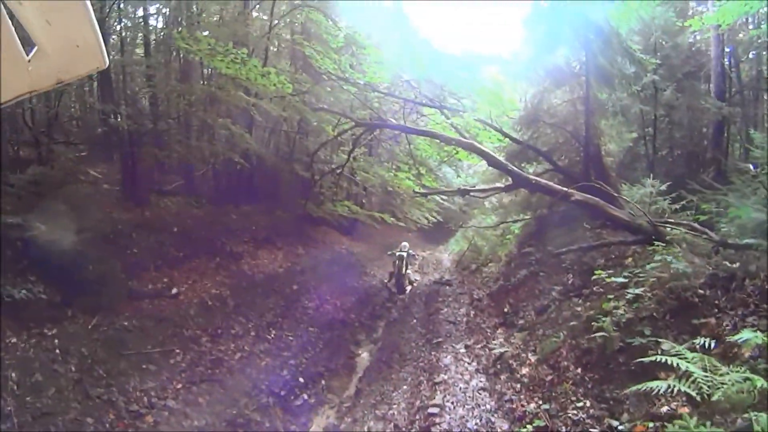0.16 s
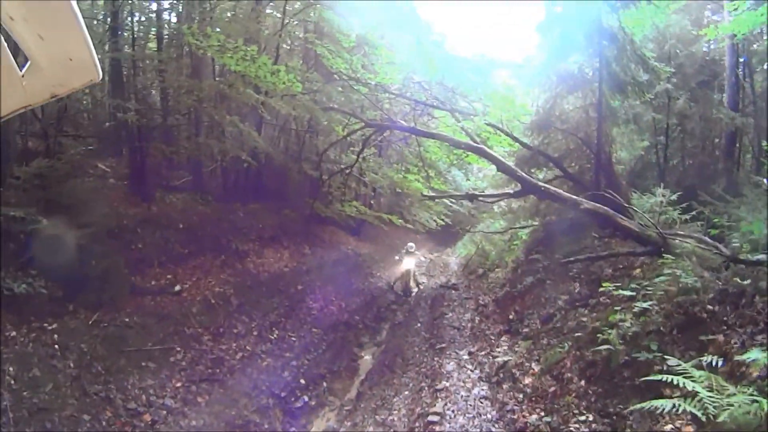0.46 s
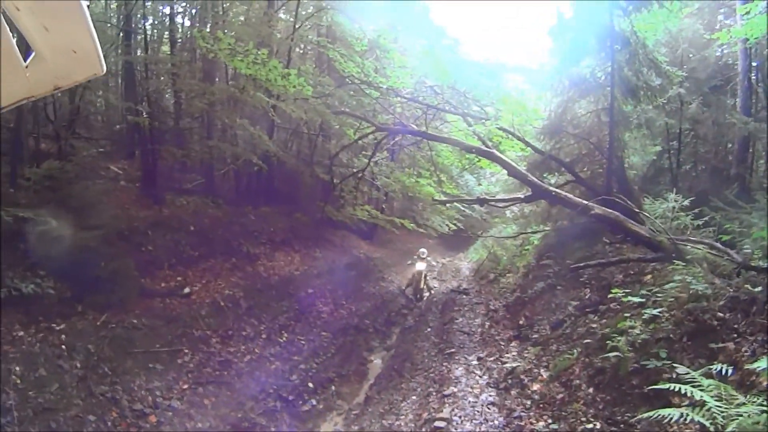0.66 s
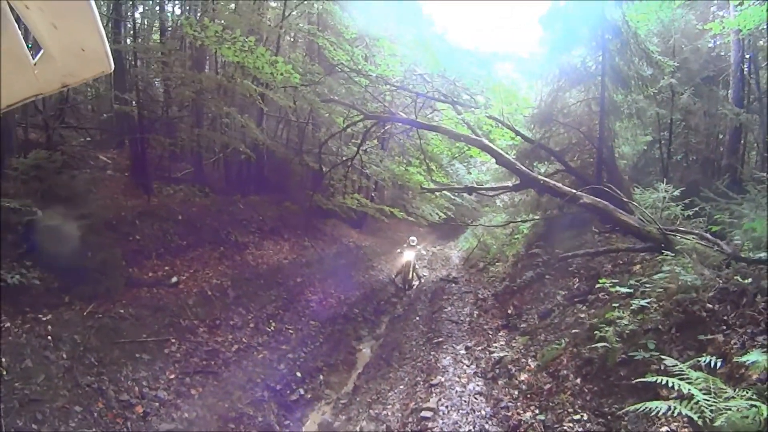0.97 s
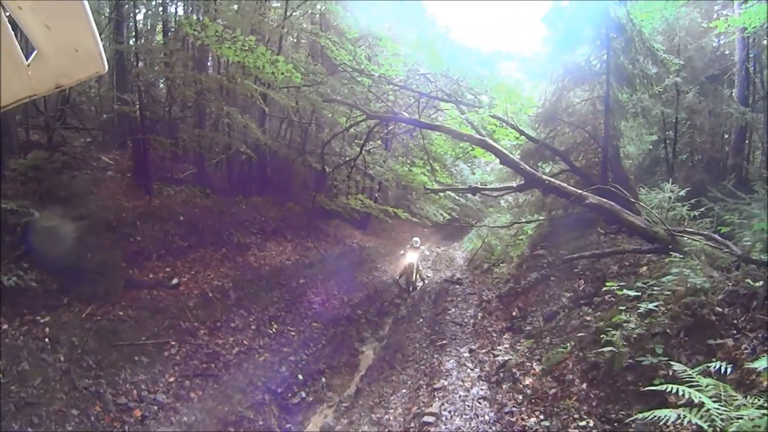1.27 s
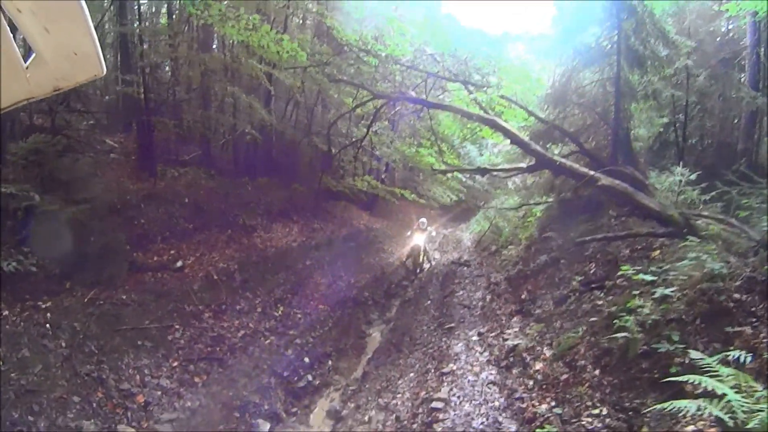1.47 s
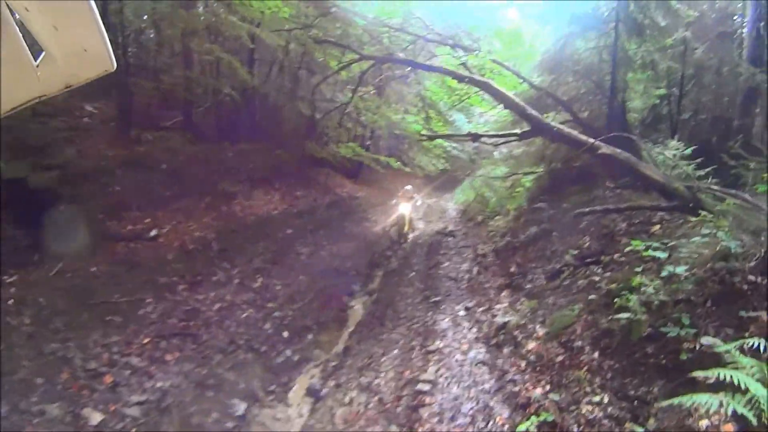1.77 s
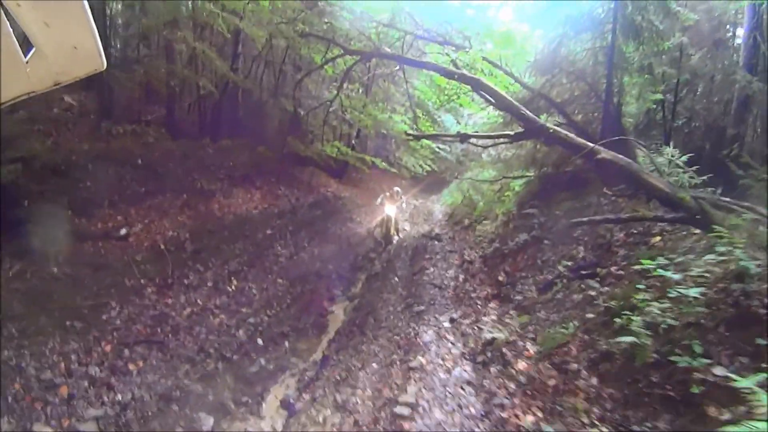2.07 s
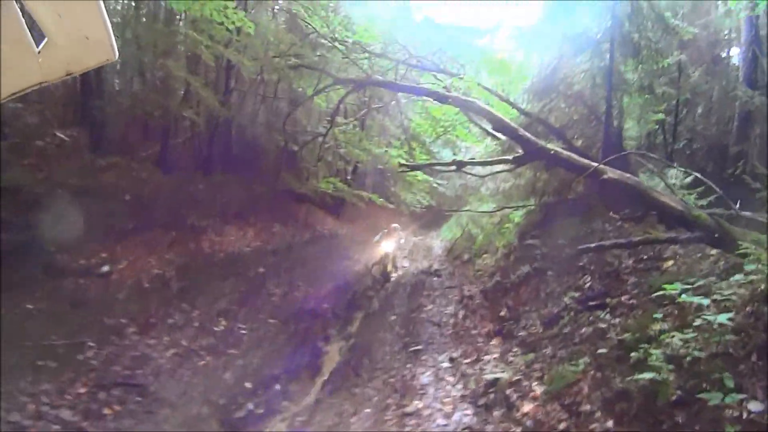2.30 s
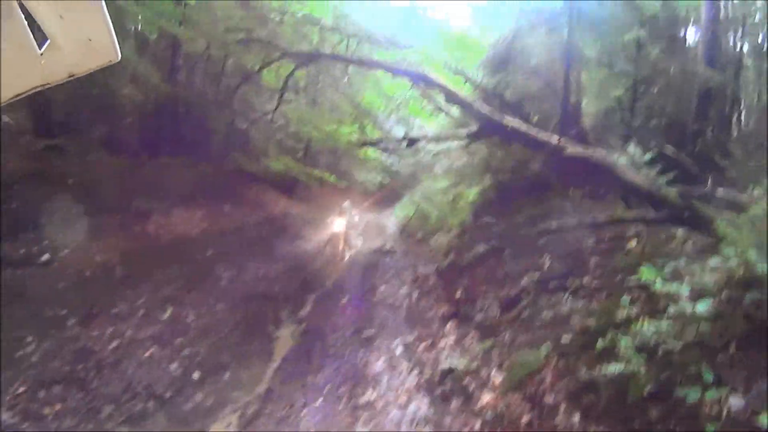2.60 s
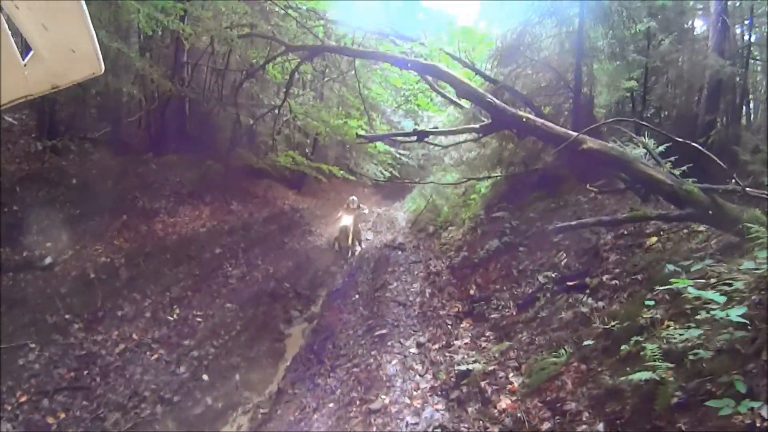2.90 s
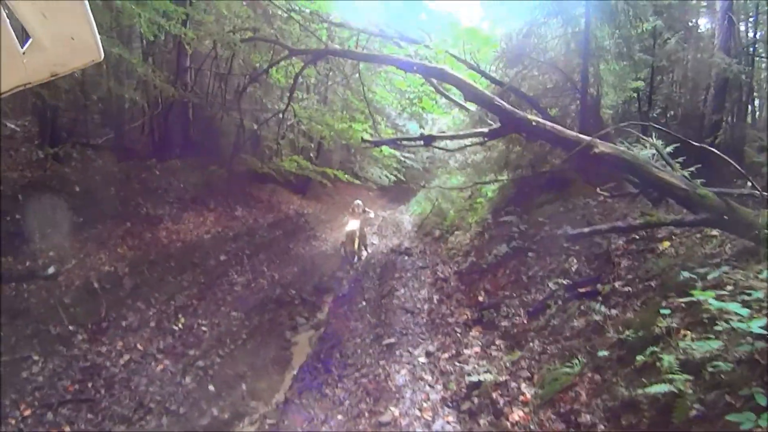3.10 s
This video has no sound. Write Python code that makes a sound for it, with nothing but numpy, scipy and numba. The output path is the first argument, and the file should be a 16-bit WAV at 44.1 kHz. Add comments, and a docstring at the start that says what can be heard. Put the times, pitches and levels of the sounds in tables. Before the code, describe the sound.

Dirt bike engine snarls, dips and climbs again among trees, with low wind rumble on the microphone

```python
"""A two-stroke dirt bike on a forest trail, heard by two microphones inside a closed housing.
Revs fall for half a second, climb to 1.5 s, fall to 2.3 s, climb higher to about 3 s and ease off.
Clean low sine partials hum, uneven firing pulses bark, noise swelling once a cycle makes the gas rasp.
The housing rings near 1.8 kHz, coloured noise makes wind and bumps rumble on it throughout,
and a level and lag per frequency give the two microphones different paths."""
import sys
import numpy as np
from scipy import signal
from scipy.fft import rfft, irfft
from scipy.io import wavfile
from scipy.ndimage import uniform_filter1d, map_coordinates
from numba import njit

SR = 44100
rng = np.random.default_rng(int(sys.argv[2]) if len(sys.argv) > 2 else 0)


def decibels_to_gain(level_db):
    """Convert a level in decibels to a linear amplitude gain (20 dB per decade)."""
    exponent = np.asarray(level_db, float) / 20
    return 10 ** exponent


def file_out(sig):
    """Save sig as 16-bit WAV at sys.argv[1]."""
    # one column per channel
    cols = np.atleast_2d(sig).T
    # limit, then scale
    lim = np.clip(cols, -1, 1)
    pcm = np.round(lim * 32767).astype(np.int16)
    wavfile.write(sys.argv[1], SR, pcm)


N = 143325

# Colour of pipe and housing. Each row: frequency in Hz, relative gain in dB.
HOUSING_COLOUR = [(200, -29.5), (330, -29.5), (450, -12), (514, -34), (629, -23), (728, -17), (867, -34),
                  (960, -23), (1080, -16), (1180, -16), (1310, -15.5), (1480, -7.5), (1600, -13.5),
                  (1690, 3), (1800, 6.5), (1950, -3), (2150, -18), (2460, -10.5), (2590, -13),
                  (2800, -11.5), (3250, -16.5), (3820, -30.5), (4870, -14.5), (6440, -31), (7200, -24.5),
                  (7560, -20), (8200, -35.5), (9880, -33.5), (11000, -46), (14300, -119)]
UNSHARED = 0.85  # power share of gas noise and echo tails that differs between the two versions


def unit(x):
    """Scale to rms 1."""
    return x / np.sqrt(np.mean(x ** 2))


def over_hz(table, column):
    """A table column on the spectrum's bins, straight on a log axis."""
    rows = np.array(table)
    bins_hz = np.fft.rfftfreq(N, 1 / SR)
    return np.interp(np.log(bins_hz + 1), np.log(rows[:, 0]), rows[:, column])


def curves(table):
    """Table columns after the first (seconds) as sample-rate curves."""
    rows = np.array(table).T
    return [np.interp(np.arange(N) / SR, rows[0], r) for r in rows[1:]]


def colour(x, table):
    """Causal filter with the (Hz, dB) shape, from the folded cepstrum of its log gain."""
    cepstrum = irfft(np.log(decibels_to_gain(over_hz(table, column=1))), N)
    cepstrum[1:N // 2] *= 2
    cepstrum[N // 2 + 1:] = 0
    return irfft(rfft(x) * np.exp(rfft(cepstrum)), N)


def band(x, lo_hz, hi_hz):
    """Steep band-pass."""
    return signal.sosfilt(signal.butter(4, [lo_hz, hi_hz], "band", fs=SR, output="sos"), x)


def walk(rate_hz):
    """Random levels held 1 / rate_hz s and slewed twice; spread near 1."""
    hold = int(SR / rate_hz)
    steps = np.repeat(rng.standard_normal(N // hold + 1), hold)
    return 1.42 * uniform_filter1d(uniform_filter1d(steps, hold), hold)[:N]


def pair(share):
    """Two noises that differ by a share of their power."""
    a, b = rng.standard_normal((2, N))
    share = np.clip(share, 0, 1)
    return np.array([a, np.sqrt(1 - share) * a + np.sqrt(share) * b])


def wind():
    """Wind and bumps on the housing: gusty low-coloured noise, two versions."""
    # Each row: time in seconds, level in dB.
    gust_level = [(0, -47), (.13, -50.5), (.27, -41.5), (.5, -45), (.78, -48), (1.0, -49), (1.25, -44),
                  (1.55, -35), (1.75, -37), (1.88, -39.5), (2.0, -44), (2.32, -42), (2.46, -44),
                  (2.55, -31), (2.64, -36), (2.73, -31), (2.81, -43.5), (3.0, -44.5), (3.1, -47.5),
                  (3.25, -35)]
    # Each row: frequency in Hz, relative gain in dB.
    rumble_colour = [(18, -36), (33, 0.5), (50, 1.5), (90, -5), (140, -4), (220, -14.5), (350, -20.5),
                     (600, -28.5), (1000, -52)]
    rumble = unit(colour(pair(share=0.85), rumble_colour))
    level_db = curves(gust_level)[0] + 2 * walk(9) + 1.17 * walk(30)
    return rumble * decibels_to_gain(level_db)


def echoes(x, tails, db):
    """Adds two short diffuse tails from trees and housing, one for each version."""
    t60_s = 0.08
    t = np.arange(SR // 10) / SR
    tail = unit(tails[:, :len(t)] * decibels_to_gain(-60 * t / t60_s)) / np.sqrt(len(t))
    return x + decibels_to_gain(db) * signal.fftconvolve(x[None], tail, axes=1)[:, :N]


def gas_rasp(phase):
    """Gas noise, strongest at each firing and decaying over the cycle; two versions."""
    decay_cycles, steady = 1, 1
    return colour(pair(UNSHARED) * (steady + np.exp(-phase / decay_cycles)), HOUSING_COLOUR)


@njit
def fire(hz, stretch, size):
    """A pulse at each wrap of the phase, shared between two samples; every cycle has its own length."""
    pulses, phase = np.zeros(len(hz) + 1), np.empty(len(hz))
    p, cycle = 0., 0
    for i in range(len(hz)):
        step = hz[i] * stretch[cycle] / SR
        p += step
        if p >= 1:
            p -= 1
            cycle += 1
            pulses[i] += size[cycle] * p / step
            pulses[i + 1] += size[cycle] * (1 - p / step)
        phase[i] = p
    return pulses[:-1], phase


def uneven_firings(hz):
    """Firing pulses and cycle phase; each cycle scatters in rate and pulse size."""
    rate_scatter, size_scatter_db = 0.0022, 2
    chance = rng.standard_normal((N // 100, 2)).T
    return fire(hz, 1 + rate_scatter * chance[0], decibels_to_gain(size_scatter_db * chance[1]))


def returning_wave(pulses, hz):
    """The pipe's returning wave: each pulse again, part of a cycle later."""
    # Each row: time in seconds, delay as a share of a cycle.
    return_delay = [(0, .5), (1.0, .5), (1.14, .529), (1.55, .529), (1.75, .5), (3.25, .5)]
    delay = curves(return_delay)[0] * SR / hz
    return 0.4 * map_coordinates(pulses, [np.arange(N) - delay])


def clean_partials(hz, levels_db):
    """Sines at multiples of the firing rate, each with its own wavering level."""
    multiples = 1, 2, 3, 6, 7
    # Unsteadiness of each partial in dB.
    waver_db = 1.8, 2, 2.5, 4, 4
    turn = 2 * np.pi * np.cumsum(hz) / SR
    out = 0
    for multiple, level_db, waver in zip(multiples, levels_db, waver_db):
        out = out + np.sqrt(2) * decibels_to_gain(level_db + waver * walk(25.095)) * np.sin(multiple * turn)
    return out


def engine():
    """Partials, firings and gas; pipe and housing colour the bands, the returning wave combs the top two."""
    # Each row: time in seconds, firing rate in Hz, dB of partials 1, 2, 3, 6 and 7, growl dB, bark dB.
    revs = [(0.0, 154.8, -40, -46.5, -70, -48, -45, -50, -30),
            (0.12, 148.4, -49, -54.5, -67, -61, -50, -46.5, -26.5),
            (0.17, 143.2, -51, -71, -61, -66, -59, -50, -32.5),
            (0.45, 85.95, -53.5, -81, -74, -78, -71, -66, -41.5),
            (0.49, 84.29, -61, -49.5, -42, -58, -84, -52, -40),
            (0.59, 95.17, -48, -40, -74, -84, -50, -50, -36),
            (0.76, 87.65, -69, -43.5, -54.5, -69, -82, -53, -36.5),
            (0.86, 98.2, -49, -35.5, -50, -79, -51.5, -52, -32),
            (0.99, 121.2, -49, -41, -54, -41.5, -62, -42, -29.5),
            (1.04, 134.2, -41, -47.5, -45.5, -87, -41, -44.5, -27),
            (1.21, 162.1, -37, -49.5, -55, -39.5, -36.5, -45, -31),
            (1.3, 166.5, -41, -53.5, -58, -36, -68.5, -41, -28.5),
            (1.45, 179.7, -34.5, -45, -66, -42, -38, -43.5, -23),
            (1.52, 188, -37, -44, -74, -21.5, -55.5, -41, -29.5),
            (1.78, 151.4, -47.5, -58, -73, -98, -45, -57, -30),
            (1.85, 145.8, -50.5, -100, -58, -74, -67, -59.5, -31.5),
            (2.0, 137.6, -42.5, -45, -57, -62, -50, -52.5, -32),
            (2.11, 145.6, -68, -49.5, -41.5, -73, -34.5, -50.5, -28),
            (2.28, 115.7, -47, -85, -76.5, -83, -68, -57, -35.5),
            (2.33, 108.4, -61, -34.5, -62, -49, -70, -44, -33.5),
            (2.43, 125.3, -39.5, -42.5, -61, -53, -59, -44, -28),
            (2.52, 143.3, -39.5, -46, -38, -79, -29.5, -40, -27.5),
            (2.67, 153, -36, -52.5, -50, -52, -48, -43, -29),
            (2.73, 180.9, -33, -49, -83, -47.5, -36, -45.5, -22.5),
            (2.85, 194.9, -30.5, -29, -60, -42, -26, -38.5, -22.5),
            (2.97, 209.5, -31, -27.5, -56.5, -24, -68, -47.5, -26.5),
            (3.11, 190.1, -36, -31, -57.5, -41, -51, -55.5, -27),
            (3.25, 173.4, -40.5, -52, -68, -68.5, -39, -44.5, -34)]
    # Each row: time in seconds, level of the housing's ring in dB.
    ring_level = [(0.0, -26), (0.09, -29), (0.4, -41.5), (1.09, -24.5), (1.48, -22), (1.66, -34.5),
                  (1.68, -25), (2.03, -26.5), (2.32, -31.5), (2.48, -23), (2.61, -30), (2.63, -22.5),
                  (3.11, -21), (3.13, -26), (3.25, -24)]
    # Each row: time in seconds, rasp dB, treble dB; both jump when the throttle opens.
    throttle = [(0.0, -24.5, -33.5), (0.12, -31, -35), (0.16, -36, -42), (0.35, -46, -52),
                (0.42, -44, -52.5), (0.47, -48, -54), (0.88, -42, -48), (1.2, -26.5, -33),
                (1.49, -27.5, -32.5), (1.71, -35.5, -40.5), (1.97, -40, -45.5), (2.07, -33, -35),
                (2.18, -38, -43), (2.33, -40.5, -48.5), (2.6, -26, -33), (2.72, -25.5, -33.5),
                (2.75, -30, -32), (2.8, -25, -31.5), (2.93, -28.5, -28), (2.97, -27.5, -29.5),
                (3.06, -31.5, -36.5), (3.25, -34, -39.5)]
    # Rougher at low revs and with the throttle shut. Each row: time in seconds, extra gas in dB.
    roughness = [(0, -1), (.12, -1), (.17, 6), (.8, 4), (1.1, -1), (1.5, 0), (1.62, 2), (1.72, 0), (2.1, 0),
                 (2.3, 4), (2.55, -2), (2.8, 1), (3.05, 3), (3.25, 4)]
    # Gas against the firings in growl, bark, ring, rasp and treble, in dB before roughness.
    gas_db = -2.5, -2, -10, -5.5, 3
    inertia_s = 0.04  # the flywheel rounds changes of speed
    flutter_db, flutter_hz = 0.9, 14
    echo_db, ring_echo_db = 2.2, -2
    edges_hz = 260, 900, 1600, 2200, 3800, 0.45 * SR

    hz, *levels_db = curves(revs) + curves(ring_level) + curves(throttle)
    hz = uniform_filter1d(hz, int(inertia_s * SR))
    pulses, phase = uneven_firings(hz)
    piped_pulses = pulses + returning_wave(pulses, hz)
    tails = pair(UNSHARED)

    def housed(train, db):
        """Pulses evened in power across revs, echoed and coloured."""
        return colour(echoes(train / np.sqrt(hz), tails, db), HOUSING_COLOUR)

    firings, ring = housed(pulses, echo_db), housed(pulses, ring_echo_db)
    piped = housed(piped_pulses, echo_db)
    gas = gas_rasp(phase)
    rough = decibels_to_gain(curves(roughness)[0])
    out = clean_partials(hz, levels_db[:5])
    for k, source in enumerate((firings, firings, ring, piped, piped)):
        lo_hz, hi_hz = edges_hz[k:k + 2]
        gas_gain = decibels_to_gain(gas_db[k]) * rough
        part = unit(band(source, lo_hz, hi_hz)) + gas_gain * unit(band(gas, lo_hz, hi_hz))
        part = part / np.sqrt(1 + gas_gain ** 2)
        out = out + part * decibels_to_gain(levels_db[5 + k] + flutter_db * walk(flutter_hz))
    return out


def scene():
    """The housing turns the second version into the difference between the microphones."""
    # Each row: frequency in Hz, side minus mid in dB, lag of side in rad.
    ports = [(40, -18, .8), (100, -18, 2.6), (218, -15.5, 0.81), (334, 12.5, 2.2), (395, 2, 0.75),
             (510, -2.5, 1.7), (610, 6.5, 1.25), (720, -1.5, 0.5), (957, 1.5, 1.7), (1205, -12.5, 3),
             (1535, -14.5, 1.9), (1760, -29, 1.9), (2160, -9.5, 2.5), (2490, 0, 3.2), (3200, 2, 2),
             (3890, 9.5, 1.8), (4870, -9.5, 3), (6500, 4, 1.34), (7200, -8, 1.45), (8300, -2, 1.4),
             (9700, -0.8, 1.64)]
    mid, other = engine() + wind()
    path = decibels_to_gain(over_hz(ports, column=1)) * np.exp(-1j * over_hz(ports, column=2))
    side = irfft(rfft(other) * path, N)
    return np.array([mid + side, mid - side])


def top_cut(x):
    """Nothing passes above the cut-off."""
    return signal.sosfilt(signal.butter(12, 11410, fs=SR, output="sos"), x)


def record(dry):
    """The finished mix as heard."""
    return top_cut(dry)


dry = scene()
out = record(dry)
file_out(out)
```